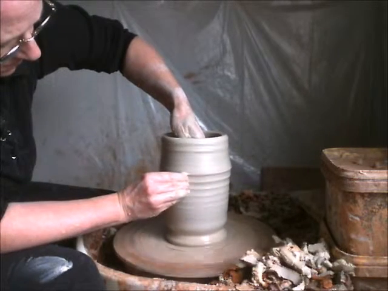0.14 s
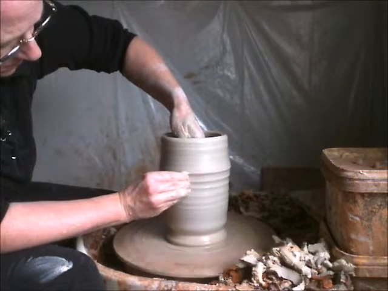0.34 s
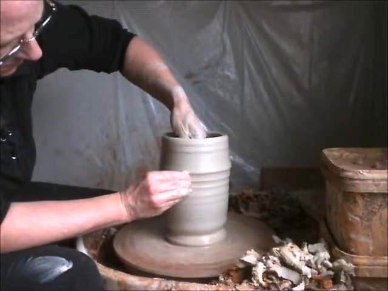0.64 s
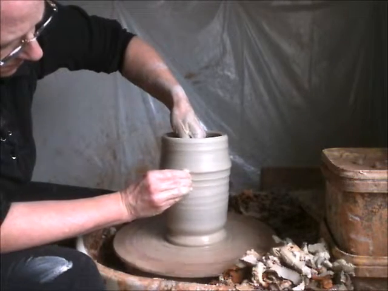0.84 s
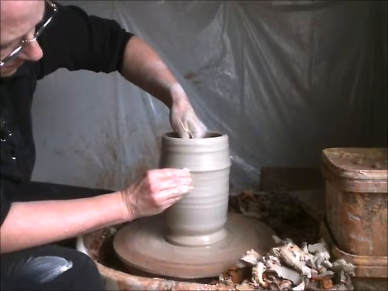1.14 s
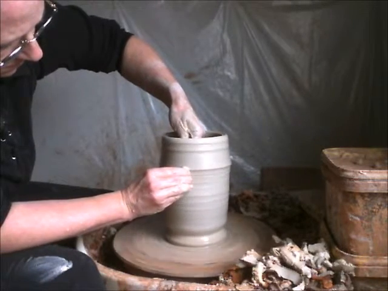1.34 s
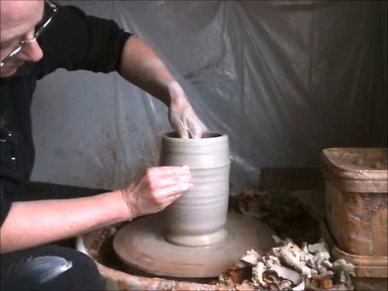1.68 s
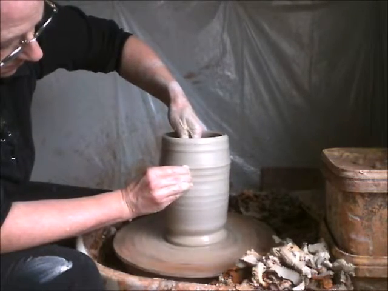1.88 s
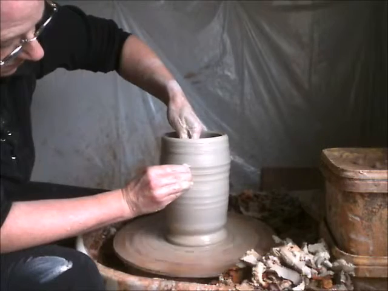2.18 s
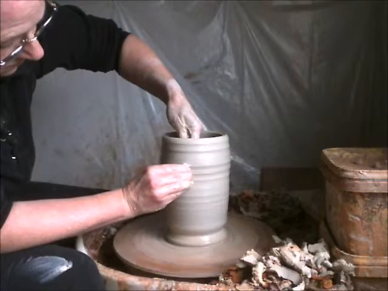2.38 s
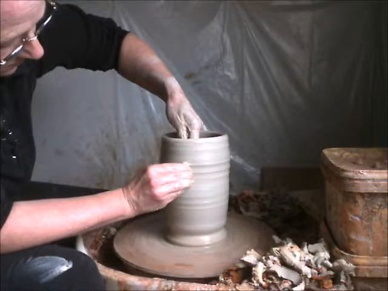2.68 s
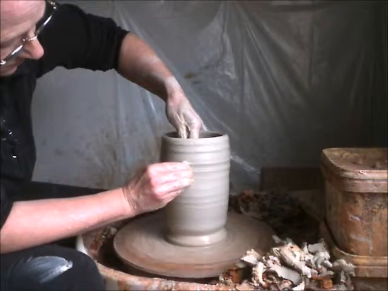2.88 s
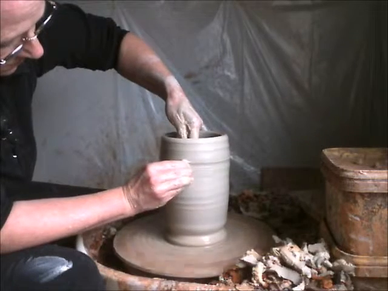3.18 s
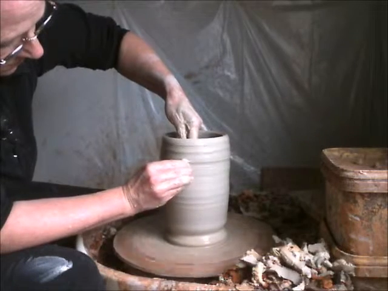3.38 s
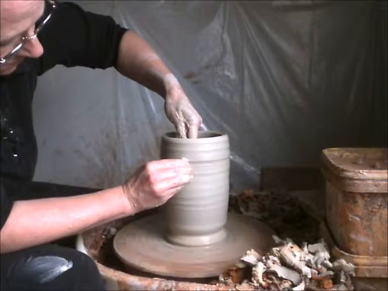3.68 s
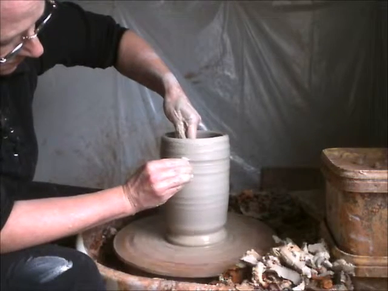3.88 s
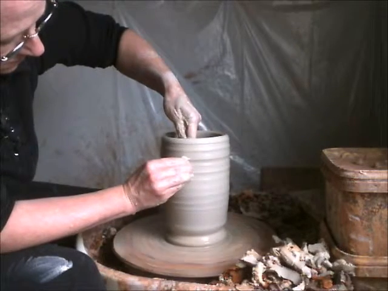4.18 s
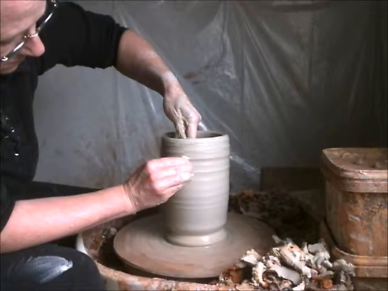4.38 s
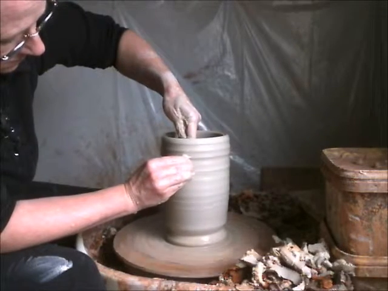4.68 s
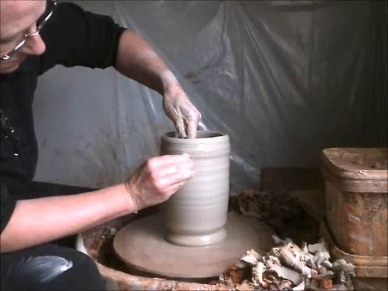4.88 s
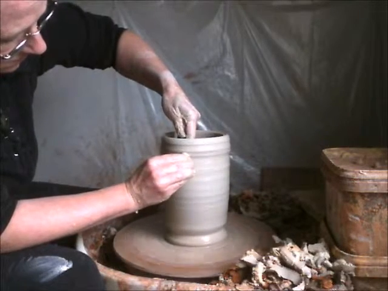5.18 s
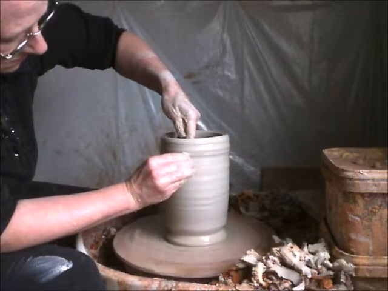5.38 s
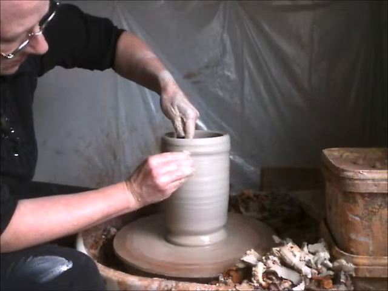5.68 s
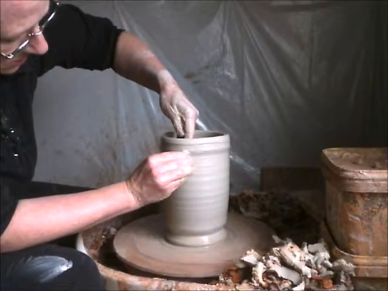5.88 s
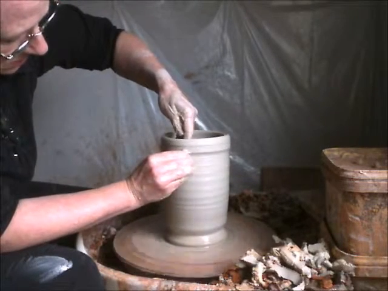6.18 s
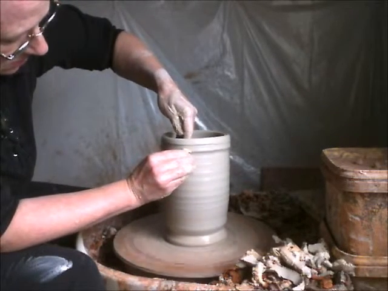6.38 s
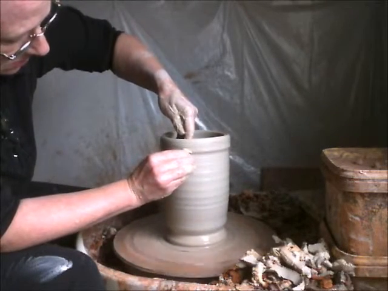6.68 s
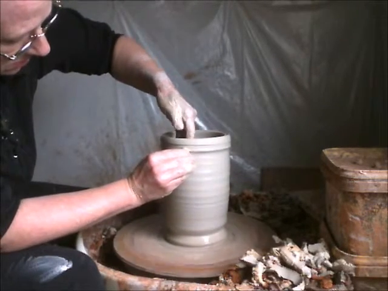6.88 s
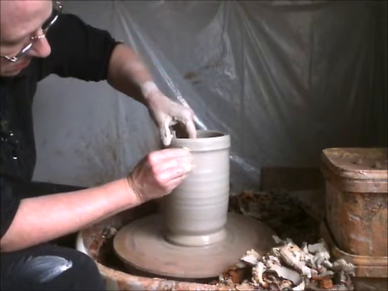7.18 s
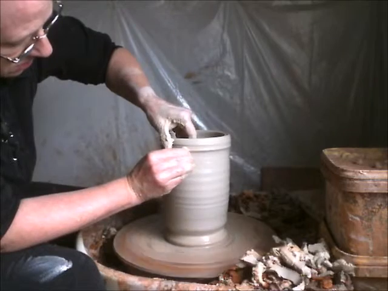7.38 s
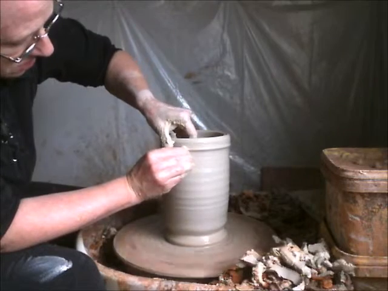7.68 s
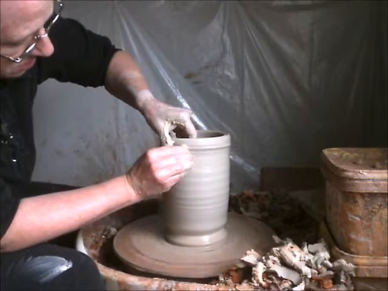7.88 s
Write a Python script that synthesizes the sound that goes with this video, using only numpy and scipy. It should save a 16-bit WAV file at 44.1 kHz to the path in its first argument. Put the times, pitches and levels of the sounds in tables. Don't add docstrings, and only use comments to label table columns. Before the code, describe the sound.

A cheap mono microphone sits close to an electric pottery wheel in a small, dry studio. From 0 s the motor is already running under slight load: low mains hum, a deep slow drone, frame rumble, a buzzing mid-low tone and a reedy whine near 630 Hz, with fine, wavering brush whine above. Faint hiss lies underneath, its treble flickering with tiny gaps. Over the first 1.5 s the pitch creeps up slightly and the whine firms as the wheel runs freely. Small, soft wet finger slips come at about 1.8, 2.2 and 2.7 s, then a sharper gritty tick at 4.4 s and another at 4.8 s. Otherwise the tone stays even. Around 6.6 s hands press the clay; the motor sags slightly in pitch, its main whine fades and a rough throbbing takes over. A short slip comes at 7.0 s, a tiny tick near 7.9 s, and the labouring continues until 8 s.

```python
import sys
import numpy as np
from scipy import signal
from scipy.fft import rfft, irfft, next_fast_len
from scipy.io import wavfile
from scipy.ndimage import uniform_filter1d, minimum_filter1d

SR = 44100
rng = np.random.default_rng(int(sys.argv[2]) if len(sys.argv) > 2 else 0)


def level_to_linear(level):
    exponent = np.asarray(level, float) / 20
    return 10 ** exponent


def transcribe(signal):
    frames = np.atleast_2d(signal).T
    limited = np.clip(frames, -1, 1)
    pcm = np.round(limited * 32767).astype(np.int16)
    wavfile.write(sys.argv[1], SR, pcm)


N = 354872

# t/s, speed/(turns per s)
SHAFT_SPEED = [(0.0, 18.206), (0.4, 18.226), (0.7, 18.323), (1.1, 18.378), (1.5, 18.422), (2.07, 18.457),
               (3.0, 18.466), (4.1, 18.483), (4.7, 18.465), (4.9, 18.446), (5.2, 18.462), (5.95, 18.428),
               (6.42, 18.462), (6.57, 18.445), (6.8, 18.256), (7.3, 18.172), (7.65, 18.146), (8.05, 18.165)]
FREE_TURNS = 18.45
BARS = 16
# multiple of shaft speed, level/dB rms
ROTOR_ORDERS = [(1, -58.4), (4, -61.1), (16, -68.1), (18, -69.7), (20, -69.4), (31, -75), (33, -64.2),
                (35.2, -90), (36, -110.0), (37, -84.4), (39, -78.4), (40, -81.7), (41, -81.0), (42, -82.4),
                (44, -84.6), (47, -83.6), (48, -71.2), (49, -91.2)]
BAR_DB, BAR_FADE_DB = -52.0, 4.5
# multiple of shaft speed, level/dB rms
FREE_BRUSH_ORDERS = [(112, -82.6), (181, -87.0), (191, -85.0), (192, -83.9), (198, -82.6), (202, -85.2),
                     (206, -84.0), (207, -76.3), (208, -82.6), (210, -81.7), (214, -85.8), (222, -85.8),
                     (223, -85.4), (224, -83.8), (225, -85.0), (240, -88.0), (241, -87.1), (244, -84.2),
                     (254, -85.3), (255, -80.2), (256, -86.7), (257, -83.1), (263, -88.7), (286, -87.4),
                     (287, -81), (288, -86.9), (303, -88.6), (319, -89.4), (321, -88.0), (335, -85.3),
                     (337, -87.4), (350, -87.9), (351, -76.7), (352, -90.5), (353, -89.3), (366, -90.8),
                     (367, -83.3), (368, -91.4), (369, -89.7), (382, -80.9), (383, -84.6), (384, -89.7),
                     (385, -83.3), (386, -85.4), (387, -89.2), (399, -88.8), (413, -89.2), (414, -83.3),
                     (415, -86.7), (416, -89.5), (429, -90.1), (430, -85.1), (436, -90.4), (437, -92.1),
                     (446, -92.4), (462, -93.8), (478, -92.8), (486, -98.2), (493, -95.9), (494, -95.7)]
# multiple of shaft speed, level/dB rms
LABOUR_BRUSH_ORDERS = [(83, -78.4), (112, -83.1), (151, -80.0), (152, -87.4), (168, -87.5), (184, -81.2),
                       (191, -86.2), (192, -86.2), (202, -84.5), (204, -84.6), (208, -84.1), (209, -84.5),
                       (210, -82.7), (214, -78.1), (241, -86.1), (247, -88.0), (251, -85.8), (255, -87.4),
                       (256, -82.4), (257, -86.1), (271, -88.3), (286, -88.7), (287, -84.8), (288, -83.4),
                       (289, -85.9), (299, -90.4), (303, -83.8), (304, -86.9), (318, -87.7), (319, -89.0),
                       (321, -90.7), (334, -85.9), (335, -83.1), (337, -86.1), (351, -84.9), (352, -90.2),
                       (366, -91.1), (367, -85.6), (368, -91.7), (369, -88.3), (384, -91.0), (398, -81.0),
                       (399, -82.3), (401, -90.5), (414, -85.0), (415, -90.8), (417, -91.4), (430, -87.0),
                       (431, -90.9), (436, -92.9), (437, -92.5), (445, -90.5), (446, -94.8), (461, -93.3),
                       (462, -87.5), (468, -97.8), (478, -96.7), (493, -97.0), (494, -94.4), (496, -99.4)]
# f/Hz, level/dB rms
WEAK_BRUSH_LEVELS = [(1000, -94), (2000, -91), (3000, -92), (3900, -89), (5000, -90), (7000, -89),
                     (8200, -92), (9500, -103), (13000, -107)]
DRIVE_RATIO, DRIVE_LEAD = 34.6027, .25
DRIVE_DB, DRIVE_FADE_DB, DRIVE_SLACK_TURNS = -52, 23, 0.0285
# offset/shaft multiples, level/dB below it
DRIVE_SIDES = [(-2.0, -22), (-1.0, -19), (-.6, -15), (-.22, -19), (1.0, -34), (2.0, -29)]
# f/Hz, width/Hz, level/dB rms on top
CASING_MODE = (641, 12, -61)
# offset/shaft multiples, level/dB, lead/cycles
CASING_THROBS = [(.6033, 1, .42), (1.0, 4, .62)]
# f/Hz, level/dB rms, wander/dB
STEADY_LINES = [
    (29.1, -53.5, 1),
    (120.0, -47.5, .7),
    (240.0, -70, 2),
    (480.0, -72, 1.2),
    (720.0, -84, 2),
    (1320.0, -83, 2),
    (1919.5, -85, 2),
]
# f/Hz, width/Hz, level/dB rms
FRAME_MODES = [(14, 5.9, -59.5), (30.3, 16, -64.5), (68.05, 14.7, -61), (97.4, 5.6, -72.5),
               (117.3, 30, -65.5), (134.54, 6.2, -69.5), (149.1, 13.4, -69), (167.8, 7.8, -72.5),
               (216.4, 6.9, -77.5), (283, 43.7, -71), (345.05, 14.6, -69), (382.5, 71, -65.5),
               (448, 11, -82), (538, 8, -76.5), (573, 6.1, -73.5), (621.4, 55.5, -65.5), (645, 8.6, -66.5),
               (679.2, 34, -71), (751, 28, -74.5)]
SHAKE_FADE_DB = 4.5
# f/Hz, level/dB per Hz
HISS_COLOUR = [(30, -78), (100, -84.5), (500, -88), (900, -93), (1250, -94.2), (1600, -96.5), (2050, -97),
               (2500, -103.5), (3150, -106.5), (3900, -105), (5750, -110.5), (7400, -107.5), (8700, -114.5),
               (10700, -117), (12500, -112.5)]
# f/Hz, width/Hz, how much likelier
THIN_SPOTS = [(8150, 50, 1.2), (8440, 50, 2), (8580, 40, 1.8), (8720, 50, 1.6), (9030, 40, .8),
              (9230, 120, 1.6), (9370, 80, .7), (9480, 50, 1.5), (9910, 50, .8), (10120, 150, 1),
              (10240, 50, .8), (10500, 150, 1.3), (10820, 300, 1.5), (11080, 120, 1.1), (11580, 50, .8),
              (11890, 50, .9), (12140, 60, .9), (12300, 110, 1.6), (12510, 50, 1.8), (12760, 160, 1.5)]
# t/s, length/s, threshold/dB over the neighbouring lines
TREBLE_GAPS = [(0.144, 0.008, 9), (0.335, 0.01, 6.5), (0.608, 0.006, 12), (0.976, 0.012, 7),
               (1.401, 0.006, 0), (1.681, 0.012, 5), (1.978, 0.011, 5), (2.133, 0.01, 5), (2.39, 0.011, 2),
               (2.574, 0.02, 11), (3.462, 0.011, 3), (3.529, 0.022, 5.5), (3.816, 0.008, 5),
               (3.899, 0.043, 8.5), (4.155, 0.004, 11), (4.265, 0.005, 12), (4.689, 0.006, 8.5),
               (4.837, 0.008, 6.5), (5.141, 0.006, 12), (5.399, 0.006, 11), (5.651, 0.006, 11),
               (5.841, 0.007, 7.5), (6.121, 0.012, 11), (6.315, 0.013, 12), (6.718, 0.006, 10.5),
               (7.317, 0.008, 5), (7.356, 0.009, 11), (7.538, 0.024, 2.5), (7.668, 0.021, 11),
               (7.912, 0.011, 13)]
BRIEF_GAPS = [3.688, 4.646, 4.754, 4.881, 5.585, 6.78, 6.886, 7.08, 7.463, 7.591, 7.718, 7.803]
BRIEF_S, BRIEF_DB = .007, 9
TOP_HZ = 12800
# t/s, length/s, level/dB rms, low edge f/Hz, high edge f/Hz
WET_SLIPS = [(1.77, .03, -63, 900, 1500), (2.17, .04, -67, 2200, 3500), (4.444, .018, -60, 3500, 9800),
             (4.445, .01, -59, 1700, 2000), (4.766, .02, -61, 1600, 2000), (2.675, .012, -62, 900, 9000),
             (4.75, .06, -66, 1400, 3500), (7.033, .028, -61, 1300, 3500), (7.033, .02, -62.5, 3500, 8500),
             (7.8635, .0012, -61, 10000, 12000), (4.446, .012, -63, 5200, 6500),
             (7.04, .012, -61, 5200, 7300), (7.043, .012, -61, 1500, 2500), (7.085, .012, -63, 1400, 2200)]
OFFSET = .0077


def at_hz(points, hz):
    point_hz, level_db = np.transpose(points)
    return np.interp(np.log(hz), np.log(point_hz), level_db)


def in_time(rows):
    return np.interp(np.arange(N) / SR, *np.transpose(rows))


def rms_one(x):
    return x / np.sqrt(np.mean(x ** 2) + 1e-20)


def drift(rate):
    r = np.exp(-80 * np.pi * rate / SR)
    noise = rng.standard_normal(N // 40 + 2002)
    slow = rms_one(signal.lfilter([1], [1, -2 * r, r * r], noise)[2000:])
    return np.interp(np.arange(N) / 40, np.arange(len(slow)), slow)


def sine(cycles):
    return np.sqrt(2) * np.sin(2 * np.pi * (cycles + rng.random()))


def band(x, low_hz, high_hz):
    edges = [low_hz, min(high_hz, .45 * SR)]
    return signal.sosfilt(signal.butter(2, edges, "band", fs=SR, output="sos"), x)


def each_turn(level_db, turns, phases, size=2 ** 17):
    spectrum = level_to_linear(level_db) * np.exp(2j * np.pi * phases)
    pattern = irfft(spectrum, size) * size / np.sqrt(2)
    return pattern[(turns % 1 * size).astype(int)]


def armature(turns, speed, wander_db=1.4):
    low = sum(level_to_linear(db + wander_db * drift(3.92)) * sine(k * turns) for k, db in ROTOR_ORDERS)
    bar_db = BAR_DB - BAR_FADE_DB * np.maximum(FREE_TURNS - speed, 0)
    return low + level_to_linear(bar_db + 2.0 + 0.506 * drift(6.3)) * sine(2 * BARS * turns)


def brushes(turns, speed, spread_db=4.5, falloff_db=1.5, free_db=-.4, labour_db=0, waver_db=2.6, count=12):
    k = np.arange(694)
    from_bar = np.abs((k + BARS / 2) % BARS - BARS / 2)
    phases = rng.random(len(k))
    group = rng.integers(0, count, len(k))
    angle = turns + .00007 * drift(5.0)
    free = np.clip((speed - 18.24) / 0.17, 0, 1)
    wavers = [level_to_linear(waver_db * drift(5)) for _ in range(count)]
    out = 0
    patterns = ((FREE_BRUSH_ORDERS, free_db, free), (LABOUR_BRUSH_ORDERS, labour_db, 1 - free))
    for strong, extra_db, share in patterns:
        chance = np.clip(rng.standard_normal(len(k)), -3, .5)
        level = at_hz(WEAK_BRUSH_LEVELS, (k + 1) * FREE_TURNS) - falloff_db * from_bar + spread_db * chance
        level[:55] = -200
        for order, db in strong:
            level[int(order)] = db + extra_db
        for g, waver in enumerate(wavers):
            group_level = level - 200 * (group != g)
            out = out + share * waver * each_turn(group_level, angle, phases)
    return out


def drive(turns, speed, sides_db=-5.0):
    cycles = DRIVE_RATIO * turns + DRIVE_LEAD + 0.01 * drift(6.2)
    sides = sum(level_to_linear(db + sides_db) * sine(cycles + k * turns) for k, db in DRIVE_SIDES)
    mode_hz, width, top_db = CASING_MODE
    throb = 0
    for k, db, lead in CASING_THROBS:
        detune = 2 * ((DRIVE_RATIO + k) * speed - mode_hz) / width
        level = level_to_linear(top_db + db + 2.0 * drift(2.9)) / np.sqrt(1 + detune ** 4)
        throb = throb + level * np.exp(2j * np.pi * (k * turns + lead))
    drag = np.maximum(FREE_TURNS - DRIVE_SLACK_TURNS - speed, 0)
    swing = level_to_linear(DRIVE_DB - DRIVE_FADE_DB * drag + 1.6 + 0.47 * drift(3.2)) + throb
    return np.sqrt(2) * np.real(swing * np.exp(2j * np.pi * cycles)) + level_to_linear(-47) * sides


def hum():
    t = np.arange(N) / SR
    return sum(level_to_linear(db + wander * drift(3.3)) * sine(hz * t) for hz, db, wander in STEADY_LINES)


def body():
    out = 0
    for hz, width, db in FRAME_MODES:
        r = np.exp(-np.pi * width / SR)
        sos = [[1, 0.00021, -1, 1, -2 * r * np.cos(2 * np.pi * hz / SR), r * r]] * 2
        ringing = signal.sosfilt(sos, rng.standard_normal(N + SR))[SR:]
        out = out + level_to_linear(db) * rms_one(ringing)
    return out


def hiss(patchy_db=1.42):
    size = next_fast_len(N)
    hz = np.maximum(np.fft.rfftfreq(size, 1 / SR), 1)
    colour = rfft(rng.standard_normal(size)) * level_to_linear(at_hz(HISS_COLOUR, hz)) * np.sqrt(SR / 2)
    edges = [0, 1000, 2500, 6000, SR]
    out = 0
    for low, high in zip(edges, edges[1:]):
        part = irfft(colour * (hz >= low) * (hz < high), size)[:N]
        out = out + part * level_to_linear(patchy_db * drift(12))
    return out


def treble_gaps(x, size=1024, margin_db=7.0, lift_share=1.0):
    hz, t, lines = signal.stft(x, SR, nperseg=size, noverlap=size * 7 // 8)
    keep = np.ones(lines.shape)
    chance = uniform_filter1d(rng.standard_normal(lines.shape), size=40, axis=1)
    chance = rms_one(uniform_filter1d(chance, size=3, axis=0))
    thin = sum(share * np.exp(-(2 * (hz - centre) / (width + 40)) ** 4) for centre, width, share in THIN_SPOTS)
    limit = np.interp(hz, [6000, 8000, 8600], [4, 2.2, 1.5]) - thin
    keep[chance > limit[:, None]] = .03
    for s, length, over_db in TREBLE_GAPS + [(s, BRIEF_S, BRIEF_DB) for s in BRIEF_GAPS]:
        frames = np.abs(t - s) < length / 2 + .004
        power = (np.abs(lines[:, frames]) ** 2).sum(axis=1)
        around = uniform_filter1d(power, size=31)
        threshold = around * level_to_linear(min(over_db - margin_db, 3.5) - 2 + hz / 3000) ** 2
        peak = (power > threshold) & (-power <= minimum_filter1d(-power, size=7))
        strong = (peak | np.roll(peak, 1) | np.roll(peak, -1)) & (hz < 8800)
        left = uniform_filter1d(power * strong, size=31) + 1e-20
        lift = np.minimum((around / left) ** (lift_share / 2), 3.2)
        keep[:, frames] = np.where(hz < 1700, 1, strong * lift)[:, None]
    keep[hz > TOP_HZ] = 0
    return signal.istft(lines * keep, SR, nperseg=size, noverlap=size * 7 // 8)[1][:N]


def slips():
    out = np.zeros(N)
    for s, length, db, low_hz, high_hz in WET_SLIPS:
        grit = rng.standard_normal(8192) * level_to_linear(2.7 * rng.standard_normal(8192))
        u = np.arange(8192) / SR / length
        envelope = np.minimum(u / 0.021, 1) * np.exp(-u ** 2 * 0.21)
        puff = rms_one(band(grit, low_hz, high_hz)) * envelope
        i = round(s * SR)
        out[i:i + 8192] += level_to_linear(db) * puff[:N - i]
    return out


def scene():
    speed = in_time(SHAFT_SPEED)
    turns = np.cumsum(speed) / SR
    motor = armature(turns, speed) + brushes(turns, speed) + drive(turns, speed)
    shake = level_to_linear(-SHAKE_FADE_DB * (speed.max() - speed) + 1.0 + 0.44 * drift(2.3))
    return (motor + hum() + shake * body() + hiss() + slips())[None]


def top_cut(x):
    return signal.sosfilt(signal.butter(12, 12910, fs=SR, output="sos"), x)


def record(dry):
    mix = treble_gaps(dry[0])[None] + OFFSET
    return top_cut(mix)


dry = scene()
out = record(dry)
transcribe(out)
```